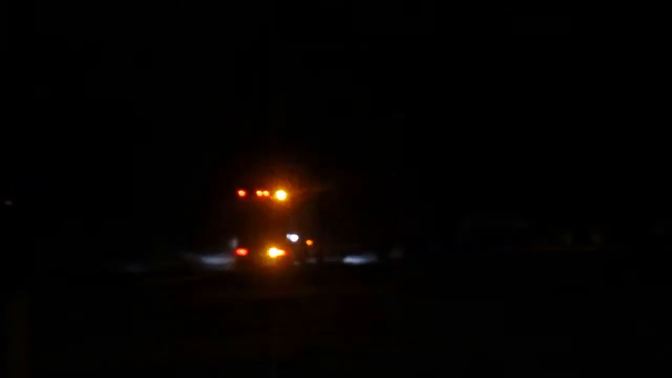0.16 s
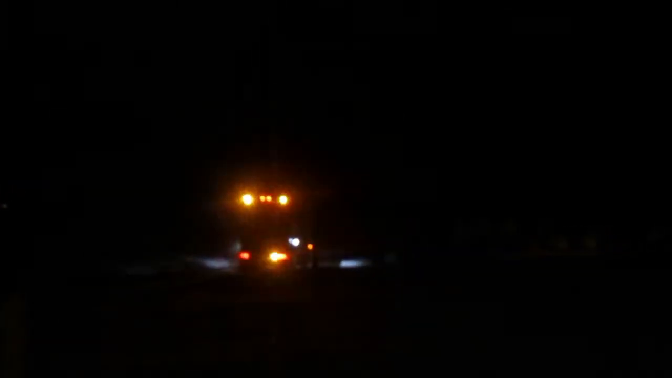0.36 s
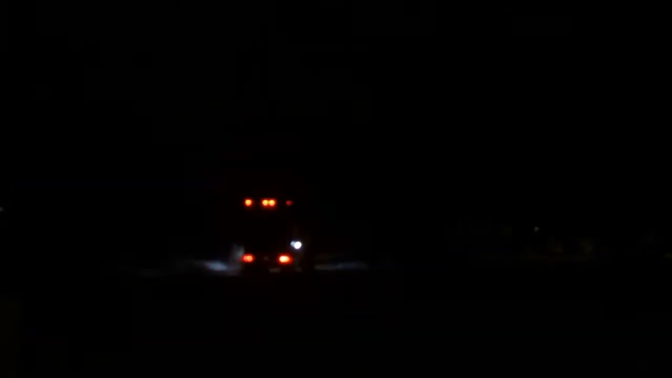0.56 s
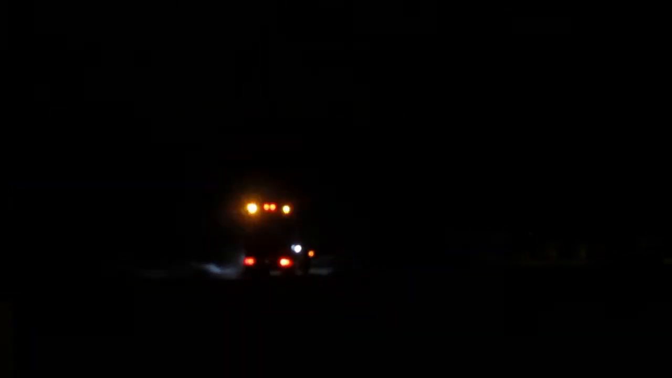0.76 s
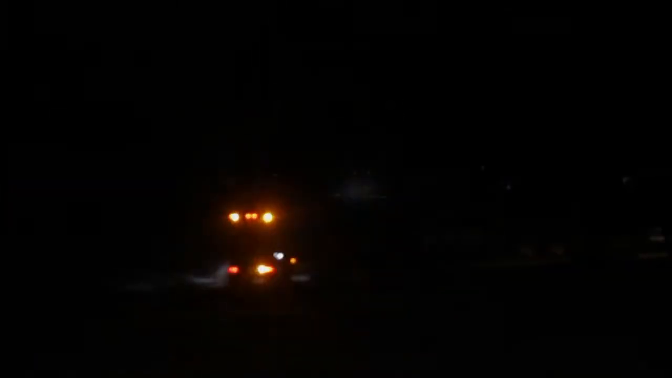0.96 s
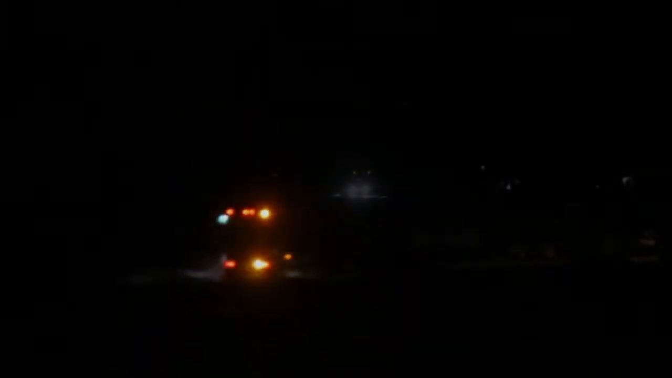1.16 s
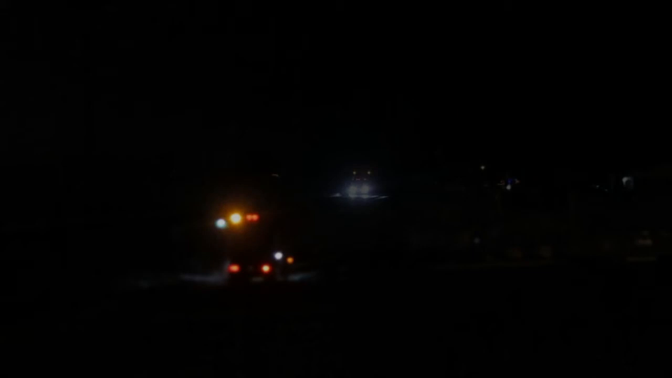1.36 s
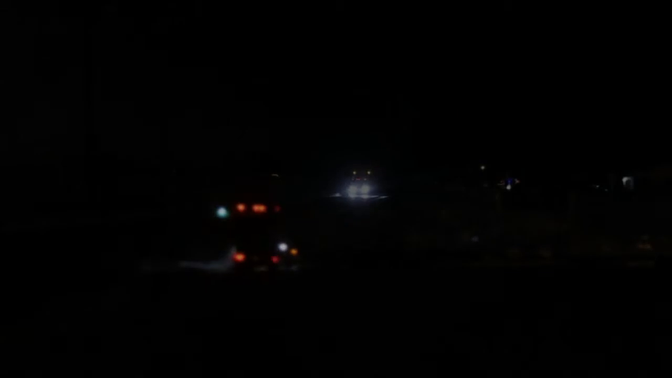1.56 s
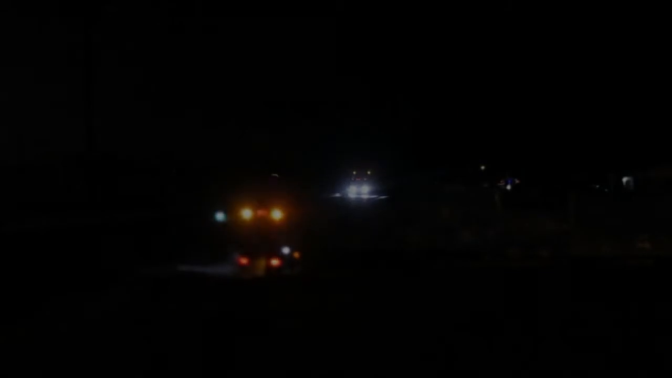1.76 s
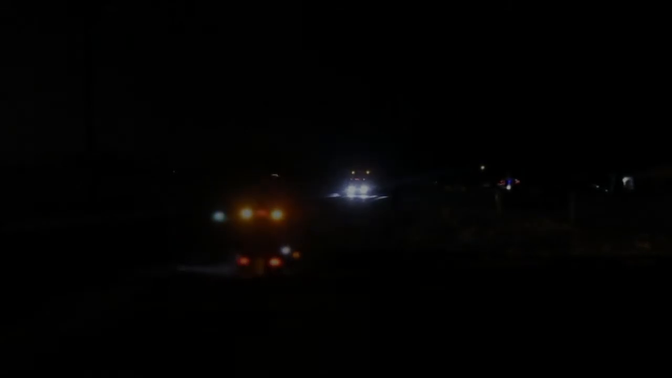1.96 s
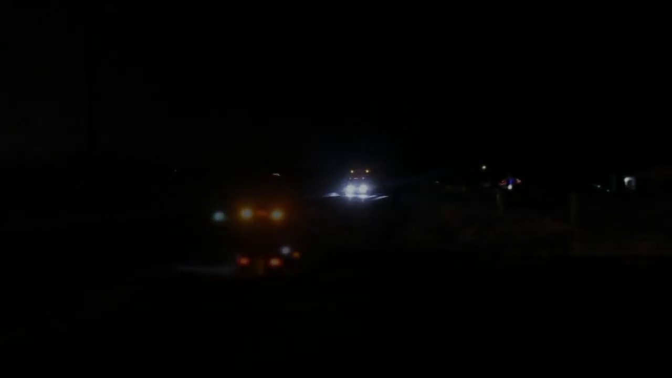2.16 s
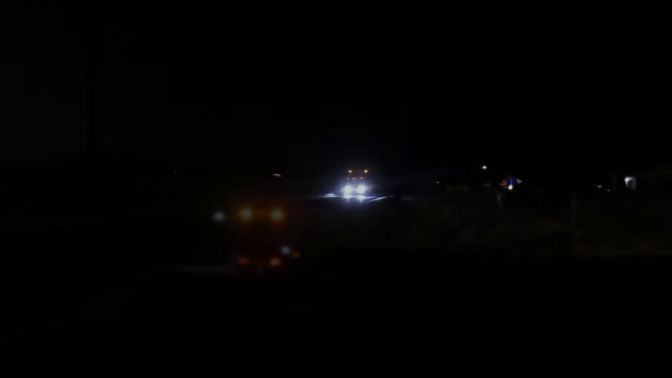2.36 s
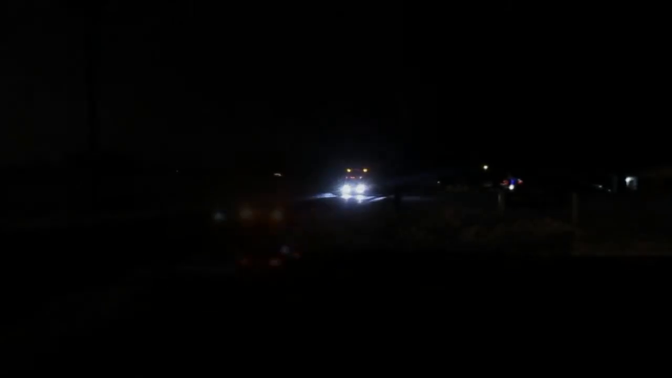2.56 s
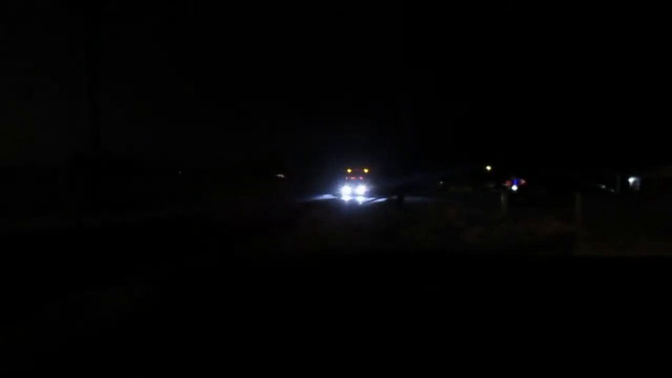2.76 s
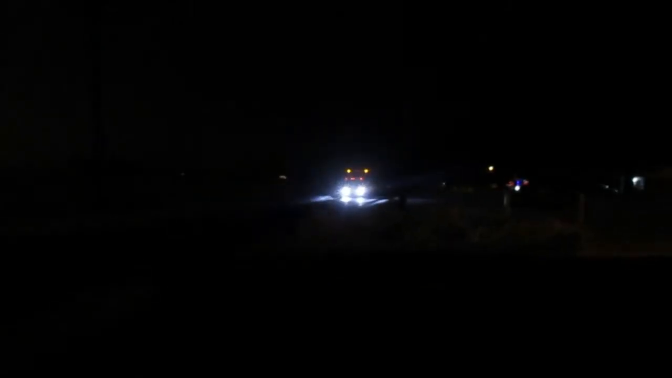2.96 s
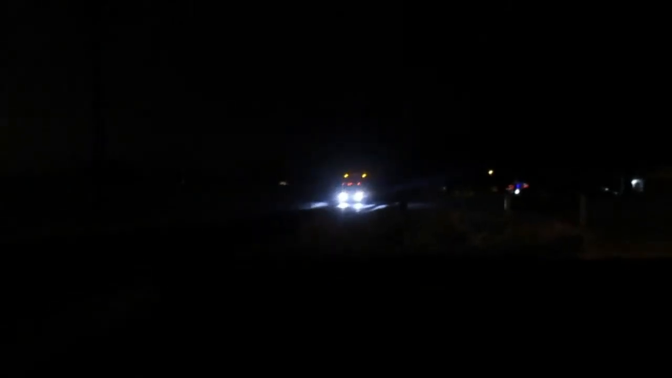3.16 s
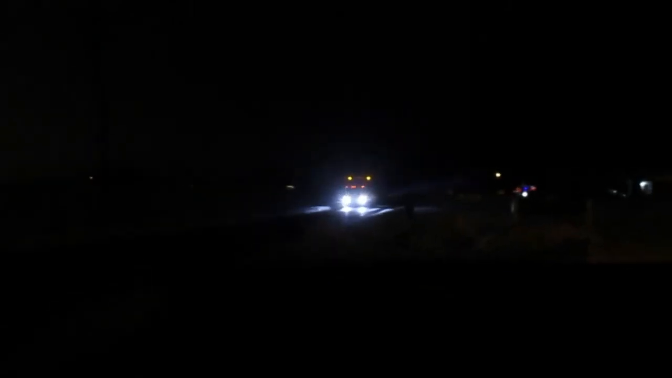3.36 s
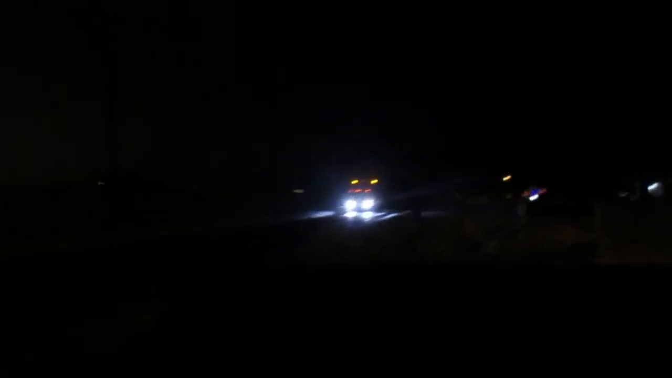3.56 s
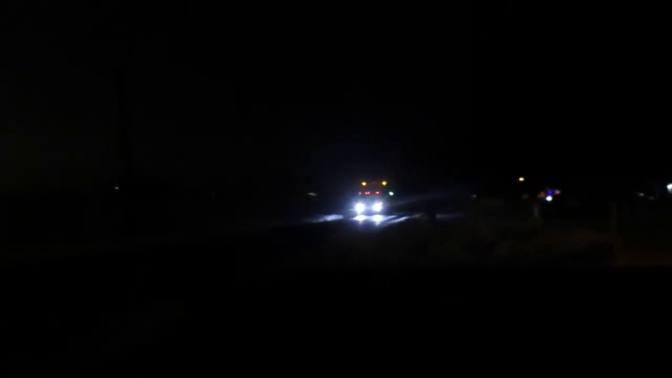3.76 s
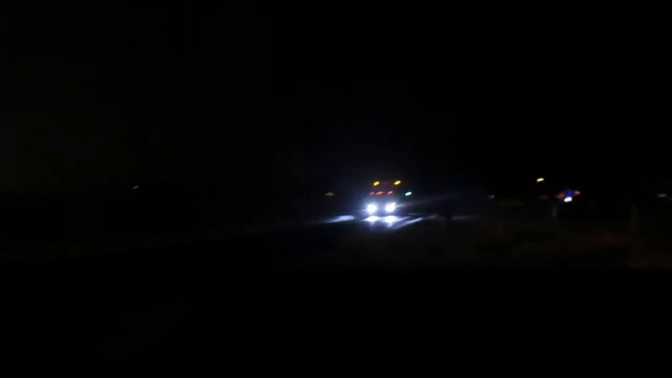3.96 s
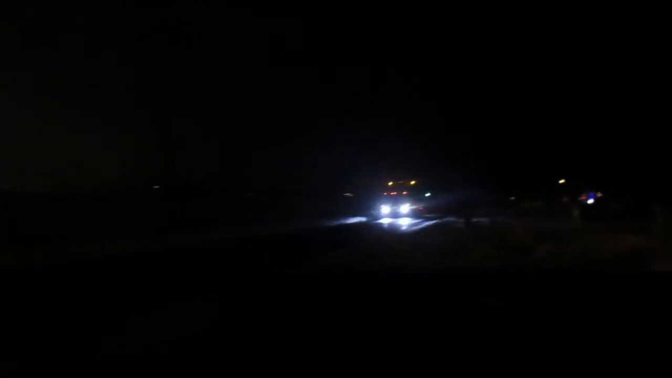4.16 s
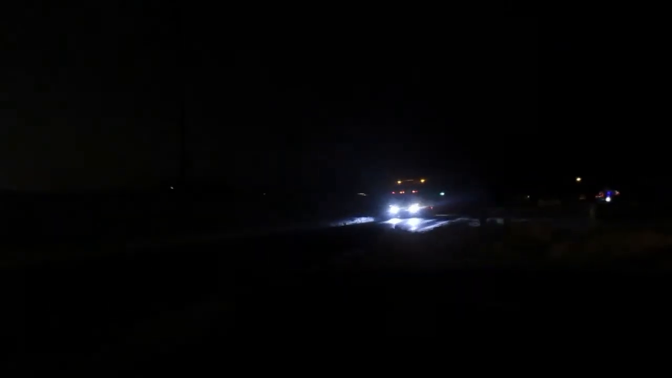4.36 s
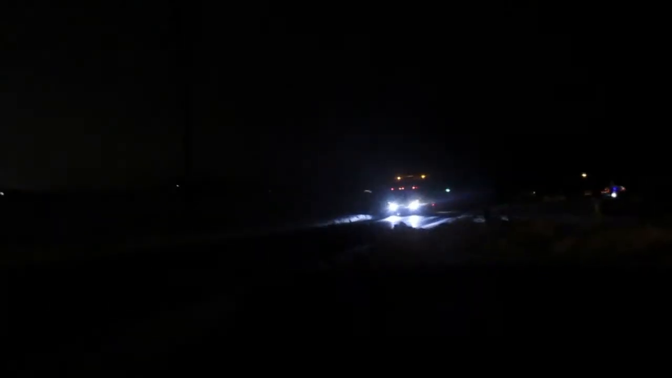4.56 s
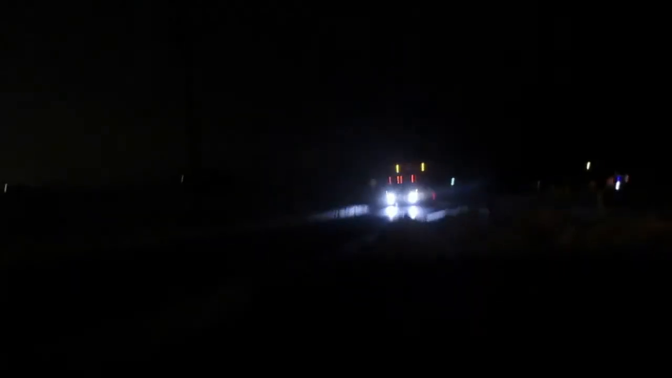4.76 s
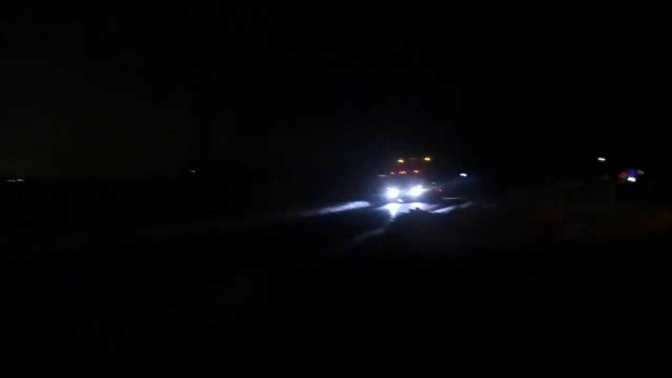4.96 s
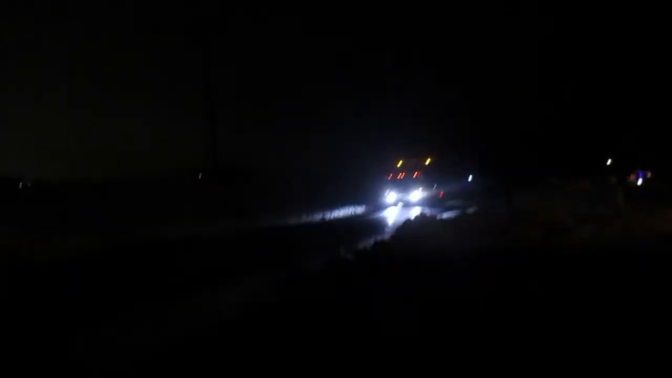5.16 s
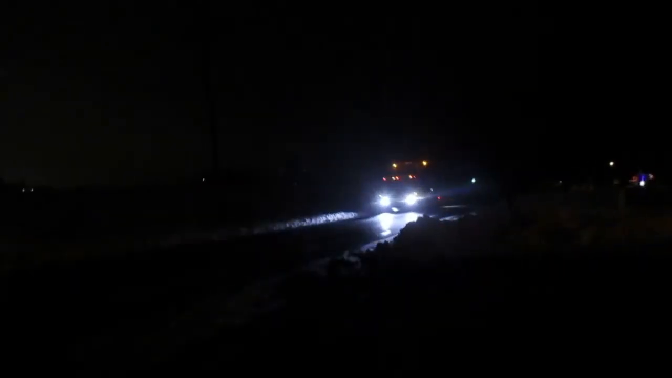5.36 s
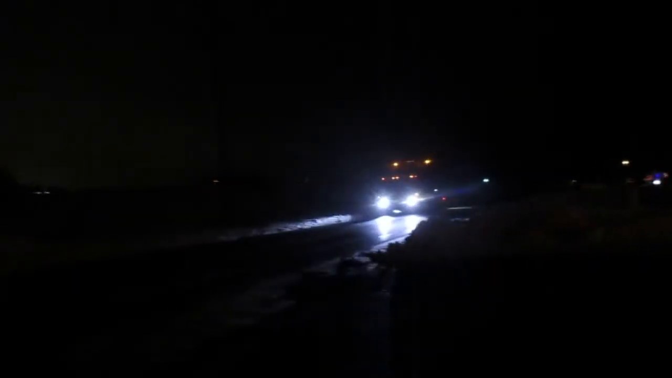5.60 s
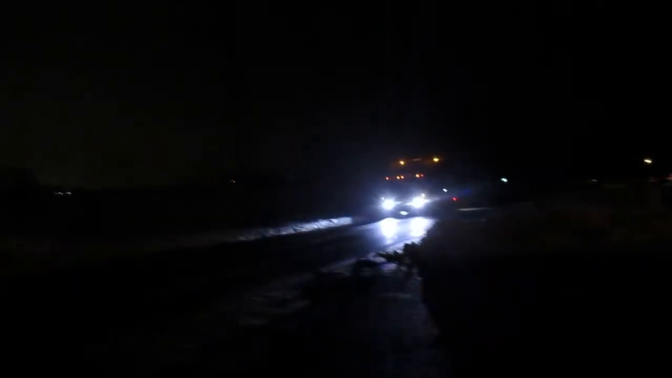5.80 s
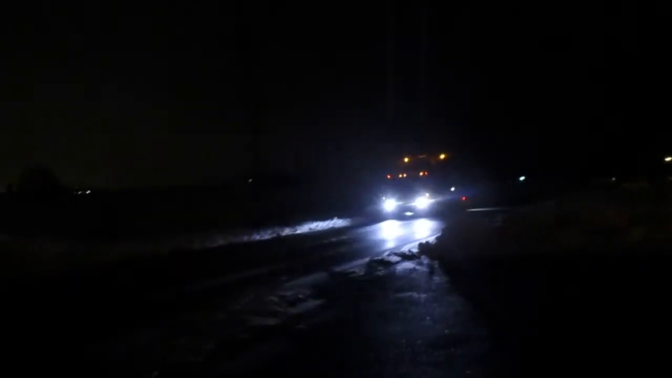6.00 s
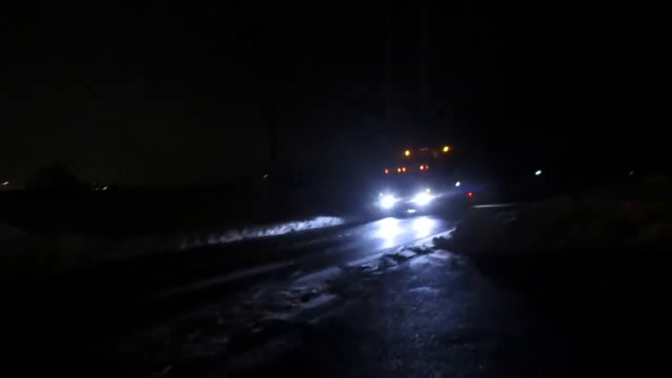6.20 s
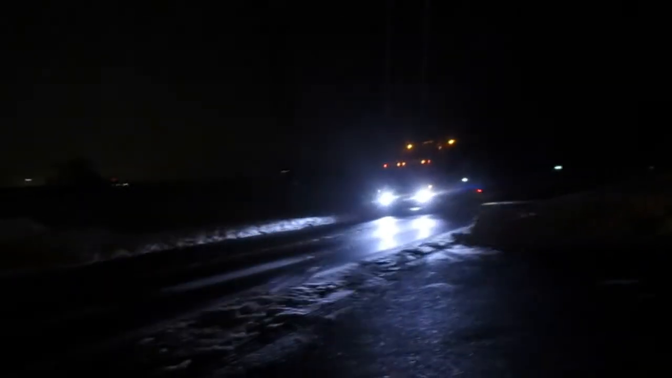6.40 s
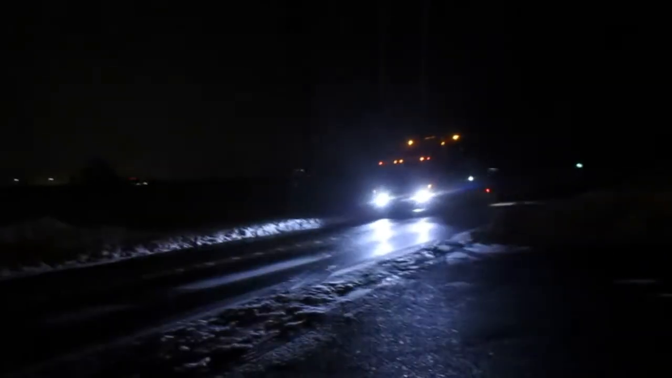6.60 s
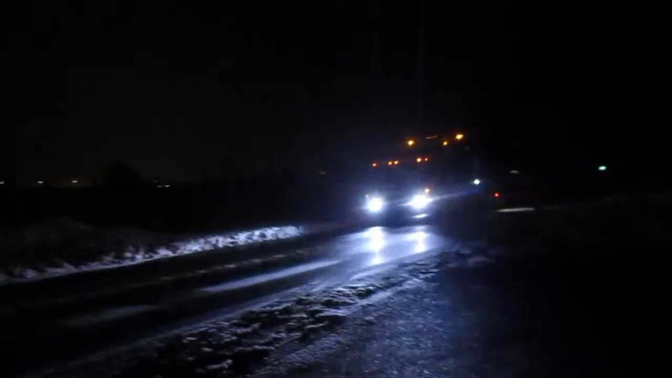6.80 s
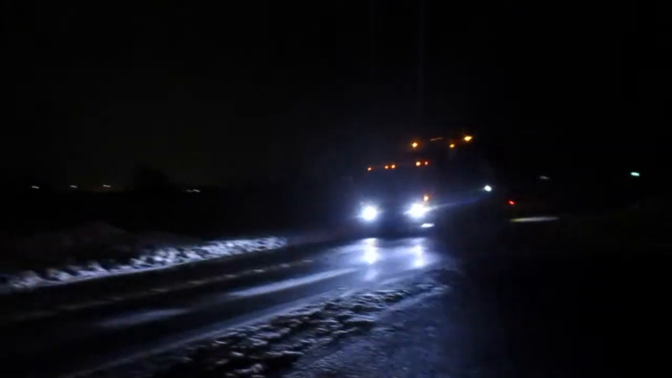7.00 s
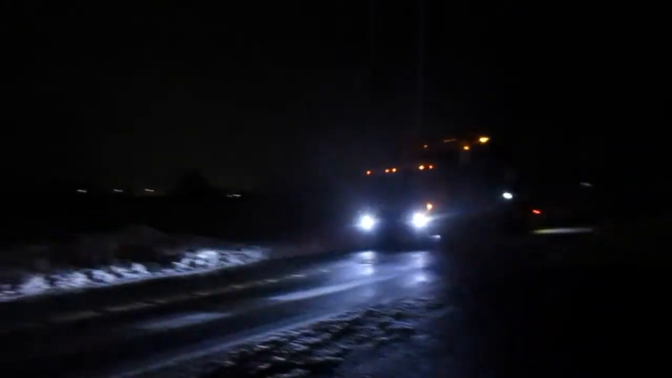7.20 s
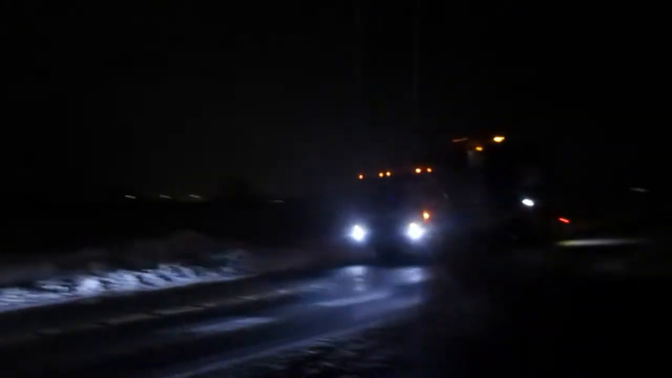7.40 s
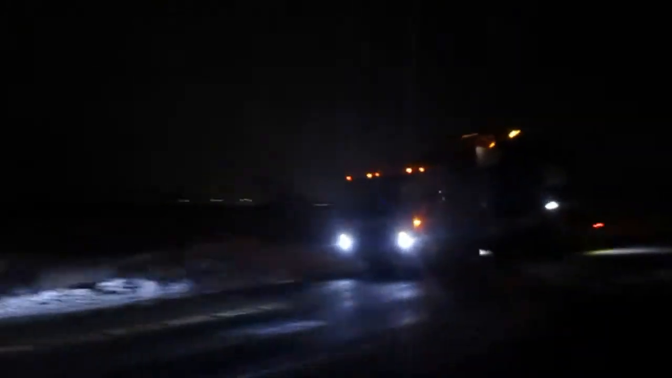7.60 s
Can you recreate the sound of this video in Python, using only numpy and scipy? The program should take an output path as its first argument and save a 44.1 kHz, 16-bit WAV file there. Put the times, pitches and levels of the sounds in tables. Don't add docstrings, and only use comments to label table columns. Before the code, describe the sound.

Quiet diesel engine recedes, cuts out; a faint far truck dies away; then a nearer truck shifts gear and swells loudly over wet asphalt with a short horn.

```python
import sys
import numpy as np
from scipy import signal
from scipy.fft import dct
from scipy.io import wavfile
from scipy.ndimage import uniform_filter1d, map_coordinates

SR = 44100
rng = np.random.default_rng(int(sys.argv[2]) if len(sys.argv) > 2 else 0)


def transcribe(u):
    v = np.clip(np.atleast_2d(u).T, -1, 1)
    q = np.round(v * 32767).astype(np.int16)
    wavfile.write(sys.argv[1], SR, q)


def ratio_of_db(decibels):
    return 10 ** (np.asarray(decibels, float) / 20)


N = 336924

# start t/s, end t/s
SHOTS = [
    (0, 1.692),
    (2.018, 2.846),
    (2.849, 7.64),
]
# t/s, tyre roar level/dB, view (0 leaving, 1 far, 2 close), wet spray over the roar level/dB
TRUCK = [(0, -44.5, 0.18, -15.5), (1.0, -46, 0.2, -17.5), (1.28, -47.5, 0, -17.5),
         (1.655, -50.5, 0.12, -17), (2.02, -48.5, 1.18, -24), (2.43, -54.5, 1.18, -15.5),
         (2.62, -58, 1.2, -18), (2.784, -68.5, 1.1, -12), (2.835, -86, 1.2, -10), (2.85, -39.5, 1.16, -13),
         (4.3, -39, 1.18, -6.5), (4.82, -36.5, 1.27, -10.5), (5.48, -33, 1.34, -12),
         (6.33, -26.5, 1.734, -14.5), (6.69, -22.5, 1.93, -15), (7.25, -20, 2.05, -14.5),
         (7.45, -20.5, 2, -15), (7.64, -25.5, 1.66, -13)]


def in_time(rows, step=1):
    t = np.arange(0, N, step) / SR
    rows = np.vstack(rows)
    out = np.array([np.interp(t, rows[:, 0], c) for c in rows.T[1:]])
    for start, end in SHOTS:
        own = rows[(rows[:, 0] >= start) & (rows[:, 0] <= end)]
        now = (t >= start) & (t <= end)
        if len(own):
            out[:, now] = [np.interp(t[now], own[:, 0], c) for c in own.T[1:]]
    return out


def by_truck(pair):
    return np.where(np.arange(N) / SR < SHOTS[1][0], *pair)


def rms_one(x):
    return x / np.sqrt(np.mean(x ** 2) + 1e-20)


def drift(rate_hz):
    r = np.exp(-80 * np.pi * rate_hz / SR)
    noise = rng.standard_normal(N // 40 + 2002)
    slow = signal.lfilter([1], [1, -2 * r, r * r], noise)[2000:]
    return np.interp(np.arange(N) / 40, np.arange(len(slow)), rms_one(slow))


def turns(hz, wobble):
    return np.cumsum(hz * (1 + wobble * drift(9))) / SR


def tone(cycles, db, flutter_db):
    level = np.sqrt(2) * ratio_of_db(db + flutter_db * drift(35))
    return level * np.sin(2 * np.pi * (cycles + rng.random()))


def band(x, low_hz, high_hz):
    return signal.sosfilt(signal.butter(2, [low_hz, high_hz], "band", fs=SR, output="sos"), x)


def resonance(x, hz, width_hz):
    r = np.exp(-np.pi * width_hz / SR)
    zeros = (1 - r * r) / 2 * np.array([1, 0, -1])
    return signal.lfilter(zeros, [1, -2 * r * np.cos(2 * np.pi * hz / SR), r * r], x)


def swells(rows, between_db):
    t = np.arange(N) / SR
    starts = [start for start, _ in SHOTS]
    shot = np.searchsorted(starts, t, "right")
    power = ratio_of_db(2 * between_db)
    for s, half, db in rows:
        same_shot = shot == np.searchsorted(starts, s, "right")
        power = power + ratio_of_db(2 * db - 24 * ((t - s) / half) ** 2) * same_shot
    return 10 * np.log10(power)


def exhaust():
    # t/s, firing rate f/Hz, firing tone level/dB, pipe growl level/dB
    engine = [(0.05, 59, -38.5, -48.5), (0.7, 60.4, -37, -63), (1.62, 63.4, -47.5, -51),
              (2.08, 65, -50.5, -46.5), (2.78, 70, -61, -61), (2.9, 71, -40, -34), (3.17, 66.6, -38, -29.5),
              (3.44, 54.7, -35.5, -29.5), (3.8, 56, -34, -29), (4.25, 56, -53, -62), (5.0, 41.8, -51, -47),
              (5.6, 54.7, -46, -51), (6.0, 51.0, -32, -25), (6.3, 57, -30, -30), (6.7, 67.3, -24.5, -24),
              (6.92, 58.8, -24.5, -21), (7.2, 68.84, -30, -24), (7.6, 58.4, -50, -25.5)]
    cylinders_db = [16.5, -3, 14.5, 13, -14, 10]
    # f/Hz, width f/Hz, level/dB
    pipe = [
        (274.2, 63, -14),
        (490, 180, -34),
    ]
    upper_orders_db = [
        (-21, -25, -34, -30),
        (-3, -3, -17.5, -17.5),
    ]
    hz, tone_db, growl_db = in_time(engine)
    roar_db = in_time(TRUCK)[0]
    cycles = turns(hz, wobble=.0015)
    upper_db = roar_db + 0.58 * (tone_db - roar_db)
    clean = tone(cycles, tone_db, 0.3)
    for order, pair in enumerate(zip(*upper_orders_db), 2):
        order_db = upper_db + by_truck(pair) + 2.2 * drift(6.8)
        clean += tone(order * cycles, order_db, 0.28 + 0.2 * order)
    at = np.flatnonzero(np.diff(np.floor(cycles)) > 0)
    pulses = np.full(N, 1e-18)
    pulses[at] = ratio_of_db(np.resize(cylinders_db, len(at)) + 2.7 * rng.standard_normal(N)[at])
    growl = np.zeros(N)
    for mode_hz, width_hz, db in pipe:
        ringing = resonance(pulses, mode_hz, width_hz)
        growl += ratio_of_db(db) * resonance(ringing, mode_hz, width_hz * 2)
    growl = growl / np.sqrt(uniform_filter1d(growl ** 2, size=8000) + 1e-20)
    return clean + ratio_of_db(growl_db - 6.5) * growl, cycles


def driveline():
    # t/s, axle drone f/Hz
    speed = [(0.05, 126.5), (1.62, 128.5), (2.1, 144.0), (2.75, 143.2), (2.95, 143.2), (3.75, 145.2),
             (4.25, 143.6), (5.0, 141.0), (5.7, 137.0), (6.3, 135.6), (7.0, 133.4), (7.6, 131.0)]
    # t/s, half length t/s, peak level/dB
    axle_swells = [(0.25, .22, -54), (0.722, .15, -52), (1.01, 0.14, -53), (2.17, 0.095, -41),
                   (2.4, 0.11, -56), (2.56, 0.14, -48.5), (3.034, 0.38, -34.5), (3.7, 0.38, -32.5),
                   (4.224, 0.29, -24), (4.63, 0.19, -28.5), (5.09, 0.15, -34.5), (5.402, .16, -30.5),
                   (5.701, 0.38, -31), (6.173, 0.22, -25), (6.74, 0.17, -19), (7.04, .14, -26.5),
                   (7.389, 0.33, -21.5), (7.617, 0.26, -23)]
    # t/s, half length t/s, peak level/dB
    tread_swells = [(2.08, 0.13, -56), (2.45, 0.22, -60), (3.17, 0.18, -34), (3.75, 0.26, -36.5),
                    (4.3, 0.3, -36.5), (4.6, 0.19, -36), (5.0, 0.16, -37.5), (5.87, 0.16, -33.5),
                    (6.28, 0.14, -29), (6.56, 0.2, -25), (7.08, 0.25, -25.5), (7.45, 0.16, -20.5)]
    # t/s, half length t/s, peak level/dB
    whine_swells = [
        (5.05, 0.35, -46),
        (5.7, .45, -35),
        (6.3, 0.31, -36.5),
        (6.95, 0.22, -31),
        (7.25, .2, -42),
    ]
    between_db = (-10, -14.5, -14.5)
    hz, roar_db = in_time(speed)[0], in_time(TRUCK)[0]
    over_db = roar_db + (0.71 - 1) * np.maximum(roar_db + 39, 0)
    axle_db = swells(axle_swells, roar_db + between_db[0])
    tread_db = swells(tread_swells, roar_db + between_db[1])
    whine_db = swells(whine_swells, roar_db + between_db[2])
    tread_hz = hz * 1.291
    axle = turns(hz, wobble=.003)
    tread = turns(tread_hz, wobble=.003)
    rough = turns(tread_hz, wobble=.009)
    singing = tone(tread, tread_db, 0.31)
    singing += tone(2 * tread, over_db - 16 + 2.8 * drift(2.4), 1.5)
    singing += tone(4 * rough, whine_db, 3)
    for order in (3, 5):
        singing += tone(order * rough, over_db - 13.5, 3)
    octave = tone(2 * axle, over_db + by_truck((-16.5, -6.5)) + 2.0 * drift(5.9), 2.7)
    return tone(axle, axle_db, 1.0) + octave + by_truck((0, 1)) * singing


def road_noise(firing, patchy_db, chuff):
    # low f/Hz, high f/Hz
    zones_hz = [
        (330, 480),
        (480, 1300),
        (1300, 5500),
        (5500, 15500),
    ]
    # f/Hz, density level/dB per Hz
    colours = [
        [(15, -35), (25, -9), (66, -7.5), (184, -16.5), (261, -13), (572, -21), (905, -23), (1090, -25),
         (1390, -36), (1780, -26), (2150, -39.5), (2330, -30.5), (3300, -30), (11400, -48), (15800, -57)],
        [(15, -43), (25, -7), (86, -12), (161, -4.5), (300, -5), (345, -13), (480, -19), (557, -17),
         (812, -26.5), (929, -17.5), (2030, -25), (2260, -24), (5090, -25), (12100, -47.5), (15800, -51)],
        [(15, -41), (25, -17), (161, -0.5), (284, -3), (371, -4), (729, -5), (1060, -12), (1360, -38),
         (1590, -22.5), (1980, -35.5), (2390, -34), (6310, -34.5), (8270, -31.5), (12400, -38.5), (15800, -53)],
    ]
    # rumble level/dB, rattle level/dB
    body_db = [
        (-9, -2.5),
        (-5.5, 0.3),
        (-8, -4.5),
    ]
    edges = np.geomspace(25, 17000, 35)
    hz = np.sqrt(edges[1:] * edges[:-1])
    spectra = []
    for colour in colours:
        colour_hz, colour_db = np.transpose(colour)
        spectra.append(np.interp(np.log(hz), np.log(colour_hz), colour_db))
    roar_db, view, spray_db = in_time(TRUCK, step=64)
    rumble_db, rattle_db = [np.interp(view, np.arange(len(body_db)), c) for c in np.transpose(body_db)]
    shape_db = np.array([np.interp(view, np.arange(len(spectra)), c) for c in np.transpose(spectra)])
    shape_db = shape_db + 10 * np.log10(np.diff(edges))[:, None]
    zone_db = [10 * np.log10(np.sum(ratio_of_db(2 * shape_db[(hz > lo) & (hz < hi)]), axis=0)) for lo, hi in zones_hz]
    lift_db = roar_db + np.array([rumble_db, 0 * view, rattle_db, spray_db]) - zone_db
    centres = np.sqrt(np.prod(zones_hz, axis=1))
    place = np.interp(np.log(hz), np.log(centres), np.arange(len(zones_hz)))
    white = rng.standard_normal((2, N))
    together, own = drift(4.1), drift(3.8)
    out = np.zeros(N)
    for k, p in enumerate(place):
        low = min(int(p), len(zones_hz) - 2)
        level_db = shape_db[k] + lift_db[low] + (p - low) * (lift_db[low + 1] - lift_db[low])
        level_db = np.interp(np.arange(N) / 64, np.arange(len(level_db)), level_db)
        flicker_db = patchy_db * (.5 * together + np.roll(own, k * N // len(hz)))
        out += ratio_of_db(level_db + flicker_db) * rms_one(band(white[k % 2], edges[k], edges[k + 1]))
    return out * (1 + chuff * np.cos(2 * np.pi * firing))


def road_echoes(road):
    # t/s, lag t/ms, treble level/dB, bass level/dB
    ground_echo = [(0, 1.14, -14, -13), (1.69, 1.13, -15, -13), (2.02, 1.29, -16, -7),
                   (2.84, 1.29, -16, -7), (2.85, 1.27, -18, -8), (3.5, 1.3, -12, -9),
                   (3.95, 1.27, -12, -12), (4.2, 1.2, -11, -17), (4.65, 1.28, -11, -19),
                   (5.0, 1.33, -11, -19), (5.6, 1.33, -15, -19), (7.64, 1.34, -15, -19)]
    # lag t/ms, level/dB
    verge = [
        (1.85, -25.5),
    ]
    lag_ms, treble_db, bass_db = in_time(ground_echo)
    lag = (lag_ms + .008 * drift(0.79)) * SR / 1000
    bass = signal.sosfiltfilt(signal.butter(2, 2600, fs=SR, output="sos"), road)
    mirrored = ratio_of_db(bass_db) * bass + ratio_of_db(treble_db) * (road - bass)
    echoes = map_coordinates(mirrored, [np.arange(N) - lag], order=3, mode="mirror")
    for ms, db in verge:
        echoes += ratio_of_db(db) * np.roll(road, round(ms * SR / 1000))
    return echoes


def horn():
    # f/Hz, level/dB
    partials = [(506.0, -26), (1020.5, -15.5), (1530, -25), (2039, -30.5), (2552, -31), (3063, -30),
                (3354, -50), (3537, -42), (4085, -34), (4595, -32), (5110, -42), (5620, -38)]
    # t/s, level/dB
    toot = [
        (7.434, -12),
        (7.444, 1.5),
        (7.452, -2),
        (7.465, 1),
        (7.5, -5.5),
        (7.508, -19),
        (7.53, -43),
    ]
    t = np.arange(N) / SR
    reed = sum(tone(t * hz, db, 2.3) for hz, db in partials)
    return reed * ratio_of_db(np.interp(t, *np.transpose(toot), -200, -200))


def air_valve():
    # t/s, level/dB
    hiss = [
        (3.43, -75),
        (3.47, -50),
        (3.51, -46),
        (3.538, -43),
        (3.545, -75),
    ]
    air = rms_one(band(rng.standard_normal(N), 7000, 11600))
    return air * ratio_of_db(np.interp(np.arange(N) / SR, *np.transpose(hiss), -200, -200))


def valve_ticks():
    # t/s, thin top peak level/dB, body level/dB
    ticks = [
        (3.6024, -29, -43),
        (3.6177, -22, -23.5),
    ]
    top, body = np.full(N, 1e-18), np.full(N, 1e-18)
    for s, top_db, body_db in ticks:
        top[round(s * SR)] = ratio_of_db(top_db + 15)
        body[round(s * SR)] = ratio_of_db(body_db + 24.0)
    thin = band(band(band(top, 10800, 14000), 10800, 15500), 10500, 16000)
    return thin + 1.7 * resonance(body, 4500, 380) + band(body, 3400, 5100) * 0.61


def brake_squeal():
    # t/s, f/Hz, level/dB
    squeal = [
        (2.03, 8740, -84),
        (2.1, 8720, -79),
        (2.25, 8600, -83),
        (2.4, 8500, -92),
    ]
    t = np.arange(N) / SR
    hz, db = in_time(squeal)
    return tone(turns(hz, wobble=.003), db, 3.94) * (t < squeal[-1][0]) * (t > squeal[0][0])


def blower():
    # t/s, half length t/s, f/Hz, level/dB
    whirrs = [
        (.1, 0.087, 3430, -50),
        (0.7, .12, 3450, -52.5),
        (1.224, 0.17, 3500, -57),
    ]
    air = rng.standard_normal(N)
    out = np.zeros(N)
    for s, half, hz, db in whirrs:
        whirr = rms_one(resonance(resonance(air, hz, 420), hz, 420))
        out += ratio_of_db(swells([(s, half, db)], -200)) * whirr
    return out


def scene():
    engine, firing = exhaust()
    road = road_noise(firing, patchy_db=0.69, chuff=0.036)
    trucks = engine + driveline() + road + road_echoes(road)
    details = horn() + air_valve() + valve_ticks() + brake_squeal() + blower()
    return (trucks + details)[None]


def thin_treble(x, step, follow, size=1600):
    # t/s, f/Hz above which little survives
    thinned = [
        [(0.07, 6500), (0.186, 7500), (0.392, 6600), (0.58, 7560), (0.626, 8500), (0.812, 6500), (0.905, 10000),
         (0.998, 6500), (1.043, 6450), (1.136, 7560), (1.351, 7500), (1.522, 7540), (1.651, 10000)],
        [(2.132, 10000), (2.254, 8490), (2.512, 9900), (2.637, 5540)],
        [(2.902, 10100), (2.96, 7660), (3.594, 8500), (3.785, 8510), (4.388, 10010), (4.604, 6130),
         (4.618, 6300), (4.712, 10170), (4.9, 8800), (5.014, 7400), (5.113, 8450), (5.263, 7670), (5.317, 8450),
         (5.56, 8400), (5.925, 5950), (7.032, 8800), (7.077, 10300), (7.181, 9700), (7.288, 9990),
         (7.361, 9630), (7.417, 9530), (7.499, 10070)],
    ]
    out = x.copy()
    window = np.sqrt(abs(signal.windows.hann(size)))
    hz = (np.arange(size) + .5) * SR / 2 / size
    for s, edge_hz in [row for shot in thinned for row in shot]:
        frame = slice(round(s * SR) - size // 2, round(s * SR) + size // 2)
        lines = dct(out[frame] * window, norm="ortho")
        smooth = np.sqrt(abs(uniform_filter1d(lines ** 2, size=80)) + 1e-18)
        edge = np.interp(.95 * edge_hz, hz, smooth)
        coarse = step * edge * np.maximum(smooth / edge, 1) ** follow
        kept = np.sign(lines) * np.floor(np.abs(lines) / coarse + .4) * coarse
        out[frame] -= dct((lines - kept) * (hz > 1200), type=3, norm="ortho") * window
    return out


def roll_off(x):
    return signal.sosfilt(signal.butter(12, 16310, fs=SR, output="sos"), x)


def record(dry):
    t = np.arange(N) / SR
    ramp_s = 0.00033
    gate = sum(np.clip(np.minimum(t - a, b - t) / ramp_s + (a == 0), 0, 1) for a, b in SHOTS)
    top_edge = signal.cheby2(16, 70, 16300, fs=SR, output="sos")
    narrow = signal.sosfilt(top_edge, dry[0] * gate)
    mix = thin_treble(narrow, step=2.9, follow=.65)
    return roll_off(mix[None])


dry = scene()
out = record(dry)
transcribe(out)
```